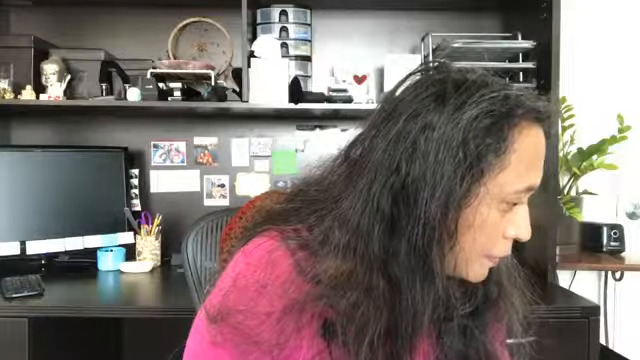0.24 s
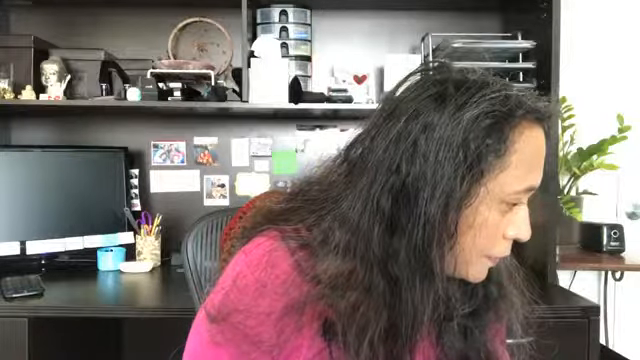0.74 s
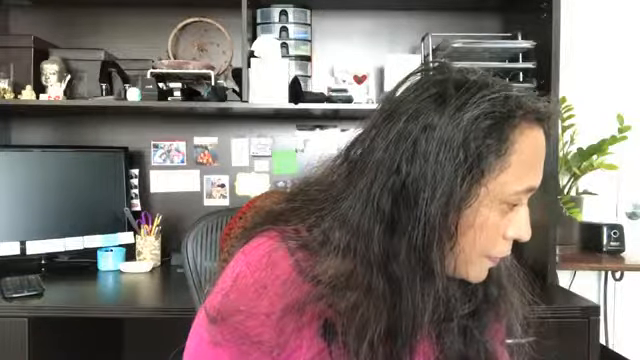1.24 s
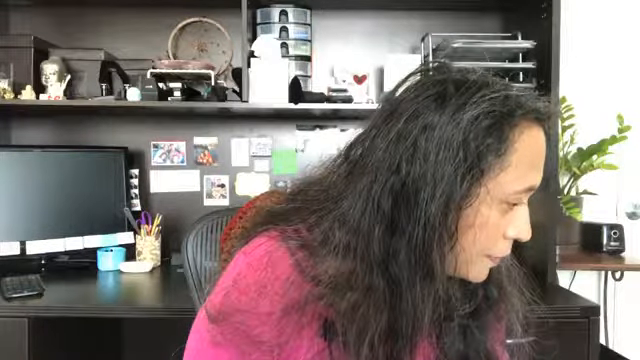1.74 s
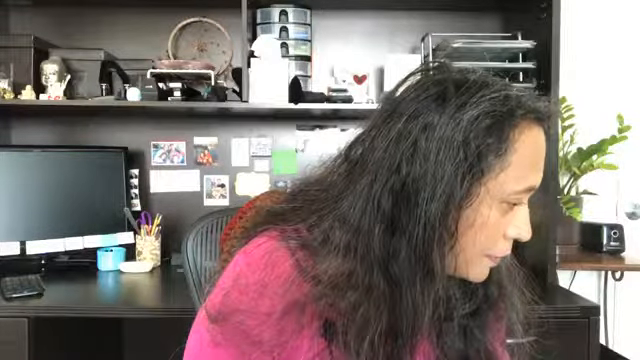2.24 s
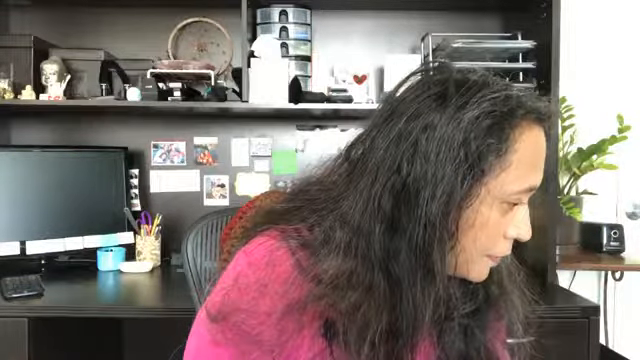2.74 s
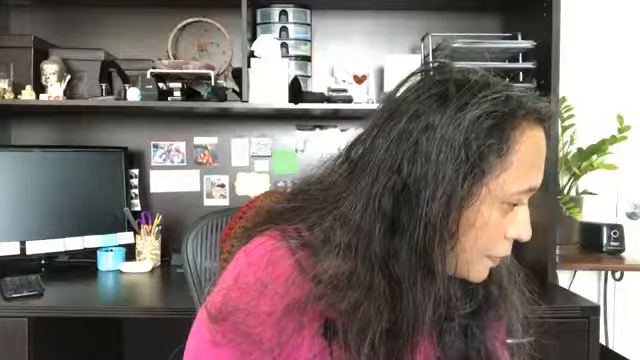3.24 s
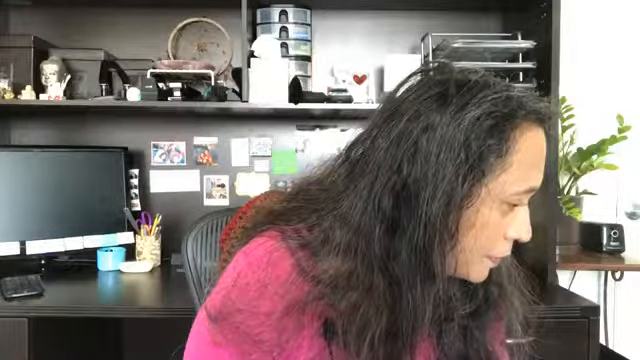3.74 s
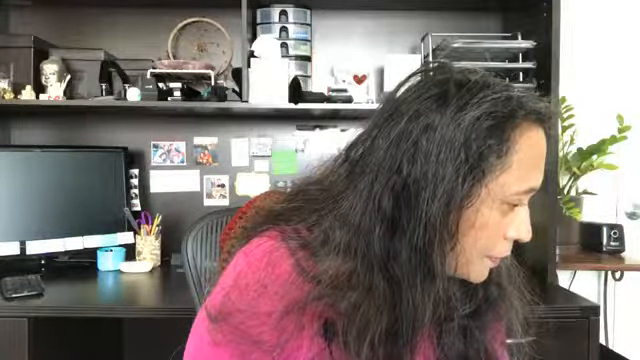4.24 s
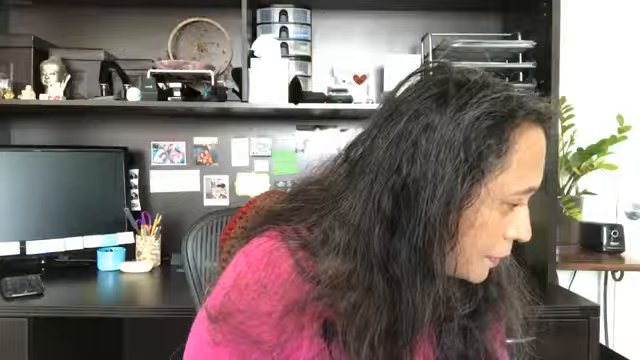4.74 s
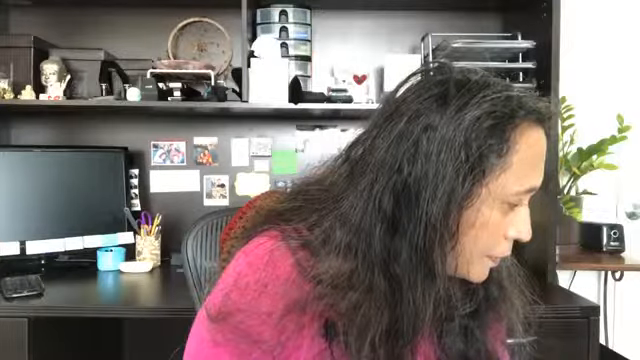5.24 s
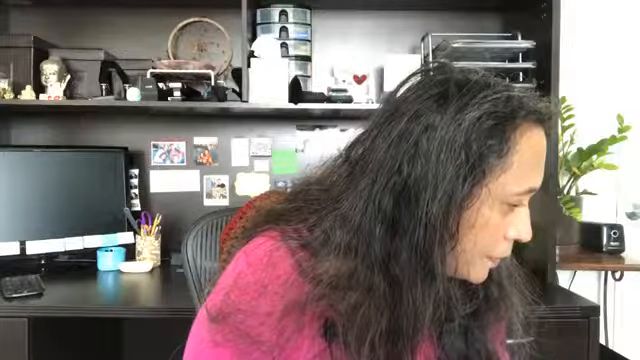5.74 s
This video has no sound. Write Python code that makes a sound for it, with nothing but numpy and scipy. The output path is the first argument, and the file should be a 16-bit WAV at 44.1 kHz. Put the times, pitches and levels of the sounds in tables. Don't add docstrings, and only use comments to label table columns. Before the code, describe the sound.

A quiet office with a small computer fan whining faintly and wavering in speed, over soft hiss and low air rumble on the microphone. A distant engine thrum fades almost at once. A mouse button is clicked three times, about two seconds apart, each a bright press and a quick release with short room echoes. Sparse, tiny plastic ticks fall in between.

```python
import sys
import numpy as np
from scipy import signal
from scipy.fft import rfft, irfft
from scipy.io import wavfile
from scipy.ndimage import uniform_filter1d

SR = 44100
rng = np.random.default_rng(int(sys.argv[2]) if len(sys.argv) > 2 else 0)


def transcribe(u):
    v = np.clip(np.atleast_2d(u).T, -1, 1)
    q = np.round(v * 32767).astype(np.int16)
    wavfile.write(sys.argv[1], SR, q)


def volts_from_db(level):
    exponent = np.asarray(level, float) / 20
    return 10 ** exponent


N = 264688


def evened(x):
    return x / np.sqrt(np.mean(x ** 2) + 1e-20)


def read(points, hz):
    f, value = np.transpose(points)
    return np.interp(np.log(hz + .1), np.log(f + .1), value)


def curve(rows, column):
    rows = np.array(rows)
    return np.interp(np.arange(N) / SR, rows[:, 0], rows[:, column])


def add(mix, s, sound):
    part = mix[round(s * SR):][:len(sound)]
    part += sound[:len(part)]


def coloured(spectrum_db):
    white = rfft(rng.standard_normal(N))
    return evened(irfft(white * volts_from_db(spectrum_db(np.fft.rfftfreq(N, 1 / SR))), N))


def resonate(x, hz, width):
    turn = np.exp(2j * np.pi * hz * np.arange(len(x)) / SR)
    r = np.exp(-np.pi * width / SR)
    return 2 * (turn * signal.lfilter([1 - r], [1, -r], x / turn)).real


def ring(modes, rise):
    t = np.arange(SR // 4) / SR
    dying = sum(volts_from_db(db - 60 * t / t60) * np.sin(2 * np.pi * hz * t) for hz, db, t60 in modes)
    return (1 - np.exp(-t / rise)) * dying


def causal(gain_db):
    gain = np.log(volts_from_db(gain_db))
    phase = signal.hilbert(np.r_[gain, gain[-2:0:-1]]).imag[:len(gain)]
    return irfft(np.exp(gain - 1j * phase))


# (time [s], blow [dB], how freely the metal dome rings [0-1])
IMPACTS = [(1.0351, -33.5, 0.2), (1.0368, -34, 0.94), (1.0385, -52, 0.3), (1.1292, -30, 0),
           (1.131, -43, 0.06), (1.1312, -49, 0.1), (3.0407, -51, .1), (3.0419, -33.5, 1),
           (3.0433, -36.5, 0.02), (3.1556, -31.5, 0), (3.156, -39, 0), (3.1556, -45.5, 0), (3.1586, -45, 0),
           (4.9693, -32, 0.85), (4.97, -45, 0), (5.0429, -38, 0.01), (5.0441, -32.5, 0.01),
           (5.0453, -48, 0), (5.0467, -47, 0.02)]
# (frequency [Hz], level [dB per Hz])
SHELL_COLOUR = [(1000, -24), (2200, -20), (3400, -12), (4400, -12), (5500, -16), (6800, -8), (7700, -3),
                (8700, -2.5), (9600, -7), (10800, -19), (11700, -11), (13200, -7), (14200, -11),
                (15200, -10), (16500, -18)]
# (frequency [Hz], change [dB])
FINGER_COLOUR = [(1000, 7.5), (3000, 0.5), (5500, 4), (8000, -1), (12000, 9.5), (13200, -2.5), (14300, -4),
                 (16500, -11)]


def shell():
    out, hz = np.zeros(N), np.fft.rfftfreq(512, 1 / SR)
    for (s, blow_db, free), chance in zip(IMPACTS, rng.random((len(IMPACTS), 24))):
        lag = np.interp(hz, np.linspace(0, SR / 2, 24), .0016 * chance ** 2)
        spread = np.exp(-2j * np.pi * np.cumsum(lag) * hz[1])
        colour_db = read(SHELL_COLOUR, hz) + (free > 0) * read(FINGER_COLOUR, hz)
        crack = irfft(spread * rfft(causal(colour_db)))
        add(out, s, volts_from_db(blow_db + 7) * (1 - .5 * free) * crack / np.linalg.norm(crack))
    return out


# (frequency [Hz], level [dB], time to fall 60 dB [s])
DOME_NOTES = [(7190, -6, .18), (7245, -1.5, .18), (7322, -6, .2), (7235, 2.5, .035), (11450, -13, .06),
              (11650, -11, .08), (11935, -7, .11), (12180, -12, .09), (12450, -12, .07), (12700, -12, .08),
              (7650, -13, .07), (8100, -6, .012), (9400, -14, .06), (12920, -12, .07), (13150, -14, .04)]
RELEASES = [1.1295, 3.1525, 5.041]
# (time [s], swell [s], frequency [Hz], level [dB])
PEELS = [
    (3.1526, 0.0021, 7260, -39),
    (5.0405, 0.00095, 7540, -36.5),
]


def dome():
    blows, t = np.zeros(N), np.arange(N) / SR
    for s, blow_db, free in IMPACTS:
        blows[round(s * SR)] = volts_from_db(blow_db) * free
    stopped = sum((t > s) & (t < s + .5) for s in RELEASES)
    held = uniform_filter1d(1. - stopped, size=80)
    out = volts_from_db(-15) * held * signal.oaconvolve(blows, ring(DOME_NOTES, rise=0.000067))[:N]
    for s, swell, squeal_hz, squeal_db in PEELS:
        u = np.arange(0, 4.5 * swell, 1 / SR)
        shape = np.where(u < swell, u / swell, np.exp(-(u - swell) / .0004))
        add(out, s, volts_from_db(squeal_db) * shape * np.sin(2 * np.pi * squeal_hz * u))
    return out


# (frequency [Hz], level [dB], time to fall 60 dB [s])
BODY_NOTES = [(189, 1, 0.046), (290, -17, 0.023), (505, -6, 0.03), (760, -1.5, 0.019), (847, 5.5, 0.018),
              (895, -8.5, 0.026), (1376, -9, 0.03), (3380, 3.5, 0.0076)]
# (time [s], level [dB])
FINGER_PUSHES = [
    (1.036, -57.5),
    (1.1297, -57.5),
    (3.042, -57.5),
    (3.1561, -57),
    (4.969, -58),
    (5.043, -55),
]


def body():
    pushed = np.zeros(N)
    for s, push_db in FINGER_PUSHES:
        pushed[round(s * SR)] = volts_from_db(push_db)
    return signal.oaconvolve(pushed, ring(BODY_NOTES, rise=0.00046))[:N]


# (time [s], peak [dB], frequency [Hz], length [s])
PLASTIC_TICKS = [(.1355, -57, 4400, .001), (0.203, -45.5, 4800, .00012), (0.2046, -54, 5000, 0.00084),
                 (0.545, -60, 4000, 0.00054), (1.428, -48.5, 5440, 0.0004), (1.438, -64, 5000, .0006),
                 (1.67, -58.5, 3720, 0.0011), (1.791, -58, 4400, .0008), (1.794, -52, 4000, 0.00071),
                 (2.41, -54, 4680, 0.00131), (2.948, -59, 4500, 0.00027), (3.8897, -59, 4500, 0.00033),
                 (4.782, -66, 4500, 0.0025), (5.192, -55, 4470, 0.00043), (5.746, -60.5, 3500, 0.00026)]


def ticks():
    out, grit = np.zeros(N), rng.standard_normal((len(PLASTIC_TICKS), 400))
    t = np.arange(400) / SR
    for (s, peak_db, hz, length), noise in zip(PLASTIC_TICKS, grit):
        puff = noise * (t / length * np.exp(1 - t / length)) ** 2
        puff[round(length * SR)] = 3
        resonance = resonate(resonate(puff, hz, width=2600), hz, width=2600)
        edge = np.diff(puff, prepend=0)
        tick = evened(resonance) + .16 * evened(edge)
        add(out, s - length, volts_from_db(peak_db) * tick / abs(tick).max())
    return out


# (delay [s], level [dB])
EARLY_ECHOES = [(.0084, -5), (.0138, -14), (.0212, -9), (.029, -14)]
# (frequency [Hz], time to fall 60 dB [s])
ROOM_DECAY = [(300, 0.53), (1000, 0.48), (3500, 0.32), (9000, 0.34), (14000, 0.33), (16000, 0.12)]


def room(x, tail_db):
    taps = np.zeros(SR // 2)
    at = np.arange(150, len(taps) - 20, 20)
    taps[at + rng.integers(0, 20, len(at))] = rng.choice([-1., 1.], len(at))
    hz, t, z = signal.stft(taps, SR, nperseg=128)
    tail = signal.istft(z * volts_from_db(-60 * t / read(ROOM_DECAY, hz)[:, None]), SR, nperseg=128)[1]
    tail *= 1 - np.exp(-(np.arange(len(tail)) / SR / 0.0018) ** 2)
    tail *= volts_from_db(tail_db) / np.linalg.norm(tail)
    for (delay, echo_db), lag in zip(EARLY_ECHOES, rng.integers(12, 40, (len(EARLY_ECHOES), 2))):
        scattered = round(delay * SR) + np.r_[0, -lag[0], lag[1]]
        tail[scattered] += volts_from_db(echo_db) * np.array([.85, .35, -.45])
    return signal.fftconvolve(x, tail)[:N]


# (start [s], length [s], swell [dB])
HIGH_SPELLS = [(.2, .55, 7), (1.237, 0.31, 8), (1.62, .79, 7.5), (2.64, .12, 6), (3.096, 0.34, 4.5),
               (4.184, 0.29, 7.5), (4.58, 0.23, 7.5), (4.954, .3, 4.5), (5.85, .2, 6.5)]


def airflow():
    t, shift_s = np.arange(N) / SR, 0.046
    start, length, swell_db = np.transpose(HIGH_SPELLS)[:, :, None]
    shifted = .5 * (np.tanh((t - start) / shift_s) - np.tanh((t - start - length) / shift_s))
    return (swell_db * shifted).sum(0), shifted.sum(0)


# (frequency [Hz], width [Hz], level [dB])
FAN_HUMS = [(112.9, 9, -77), (714.5, 35, -87), (1113, 12, -91), (1353, 54, -91.5)]
# (frequency [Hz], width [Hz], level [dB])
CASE_NOTES = [(8945, 14, 8), (9125, 16, 3), (9300, 16, 3), (9410, 20, 4), (9615, 20, 6), (9800, 50, 0)]


def fan():
    t = np.arange(N) / SR
    hunt = np.cos(2 * np.pi * (t - .3) / 1.995)
    blade_hz = 1968 + 42 * hunt + 2.5 * evened(uniform_filter1d(rng.standard_normal(N), 3000))
    waver_db = 3 * evened(uniform_filter1d(rng.standard_normal(N), 3000))
    tone_db = -88.5 - 3.5 * np.roll(hunt, 5000) + 5 * (np.roll(hunt, 1500) ** 2 - .5) + waver_db
    tone = volts_from_db(tone_db) * np.sin(2 * np.pi * np.cumsum(blade_hz) / SR)

    swell_db, shifted = airflow()
    low = coloured(lambda hz: np.maximum(-6 * ((hz - 9150) / 560) ** 4, -80))
    high = coloured(lambda hz: np.maximum(-6 * ((hz - 9880) / 300) ** 2, -80))
    whine = volts_from_db(-77 - 1.5 * shifted) * low + volts_from_db(-83.5 + swell_db) * high
    case = sum(volts_from_db(db) * resonate(whine, hz, width) for hz, width, db in CASE_NOTES)

    hums = sum(volts_from_db(db) * evened(resonate(rng.standard_normal(N), hz, width)) for hz, width, db in FAN_HUMS)
    return tone + hums + volts_from_db(-1) * (whine + .6 * case)


# (frequency [Hz], level [dB per Hz])
HISS_COLOUR = [(35, -35), (60, 0.9), (118, -7.5), (202, -12.5), (355, -14.5), (1060, -19.5), (1820, -23.5),
               (2200, -26), (3590, -28), (8500, -27.5), (11000, -27.5), (12500, -32), (15600, -30.5),
               (16200, -37)]
# (frequency [Hz], level [dB per Hz])
RUMBLE_COLOUR = [(.5, -6), (1.4, 9), (3, 1), (12, -5), (22, -11), (40, -19), (90, -31), (130, -60)]
# (time [s], level [dB])
DRAUGHT_LEVEL = [(0, -45), (1, -46.5), (2.5, -43.5), (3.7, -44.5), (4.8, -46), (6, -44.5)]


def air():
    hiss = volts_from_db(-70) * coloured(lambda hz: read(HISS_COLOUR, hz))
    low = resonate(hiss, 0, width=300) / 2
    flutter_db = 2.1 * coloured(lambda hz: -10 * np.log10(hz + 1.5) - 30 * np.log10(1 + (hz / 9) ** 2))
    rumble = volts_from_db(curve(DRAUGHT_LEVEL, 1)) * coloured(lambda hz: read(RUMBLE_COLOUR, hz) - 60 * (hz > 95))
    t = np.arange(N) / SR
    rumble = rumble * np.clip(np.minimum(t, t[-1] - t) / .03, 0, 1)
    thrum_hz, rise_s, end_s, fade_db_per_s = 41.1, 0.027, .38, 300
    thrum = np.minimum(t / rise_s, 1) * np.sin(2 * np.pi * thrum_hz * t)
    thrum = thrum * volts_from_db(-50 - fade_db_per_s * np.maximum(t - end_s, 0))
    return hiss - low + volts_from_db(flutter_db) * (low + rumble) + thrum


# (frequency [Hz], margin [dB])
SILENT_BELOW = [(10600, -5), (11000, -2), (11500, -4.5), (13000, -5), (14000, -4.5), (15500, -1.5)]


def thin_treble(x, follow):
    hz, t, z = signal.stft(x, SR, nperseg=1024)
    centre = hz[4:512:8]
    power = (abs(z[:512]) ** 2).reshape(64, 8, -1).mean(1)
    band_db = 10 * np.log10(uniform_filter1d(power, size=3) + 1e-20)
    loud_db = band_db[18:36].max(0)
    excess_db = np.maximum(loud_db - np.median(loud_db), 0)
    lift_db = np.outer(np.where(centre > 13400, follow, .15), excess_db)
    usual_db = np.median(band_db, axis=1)
    edge_db = (usual_db + read(SILENT_BELOW, centre) + 1.7)[:, None] + lift_db
    attack = np.diff(loud_db, prepend=0) > 8
    attack |= np.roll(attack, 1)
    empty = (band_db < edge_db) & (centre > 10600)[:, None] & ~attack
    z[:512] *= np.repeat(np.where(empty, .05, 1), 8, axis=0)
    return signal.istft(z, SR, nperseg=1024)[1][:N]


def scene():
    crack, metal, thump, creaks = shell(), dome(), body(), ticks()
    far = crack + volts_from_db(-9) * metal + volts_from_db(-1.5) * thump + volts_from_db(-10) * creaks
    near = crack + metal + thump + creaks
    return (near + room(far, tail_db=-2.5) + fan() + air())[None]


def top_cut(x):
    return signal.sosfilt(signal.butter(12, 16160, fs=SR, output="sos"), x)


def record(dry):
    thinned = thin_treble(dry[0], follow=.6)[None]
    low_pass = signal.firwin(511, 16000, window=("kaiser", 9), fs=SR)
    limited = signal.oaconvolve(thinned, low_pass[None], "same")
    return top_cut(limited)


dry = scene()
out = record(dry)
transcribe(out)
```